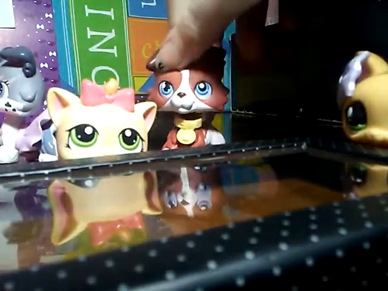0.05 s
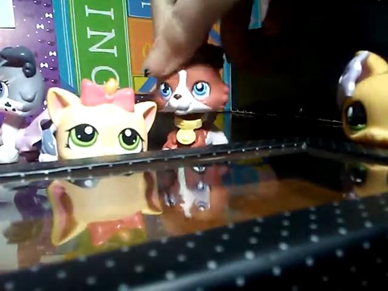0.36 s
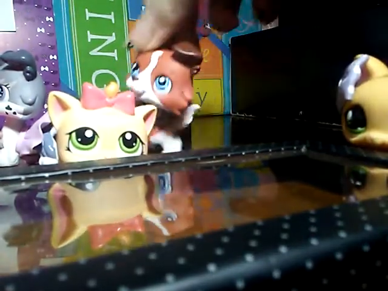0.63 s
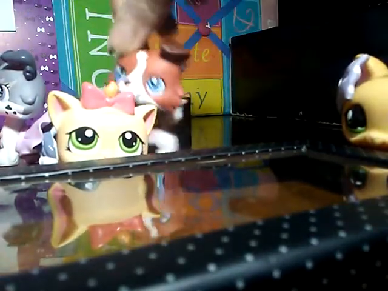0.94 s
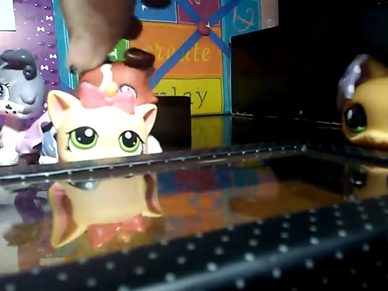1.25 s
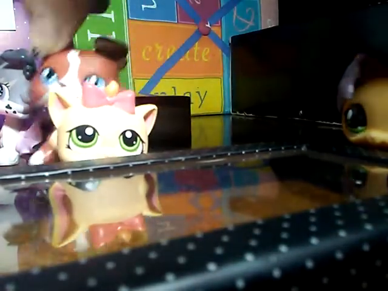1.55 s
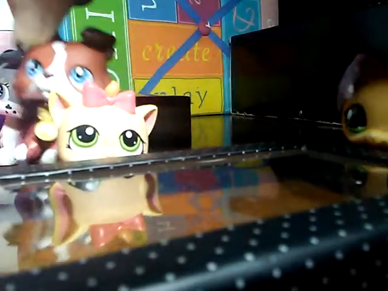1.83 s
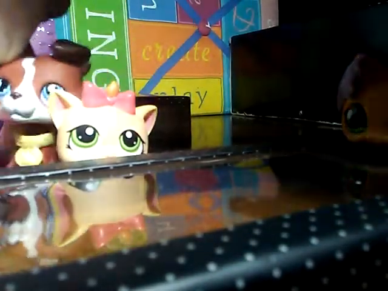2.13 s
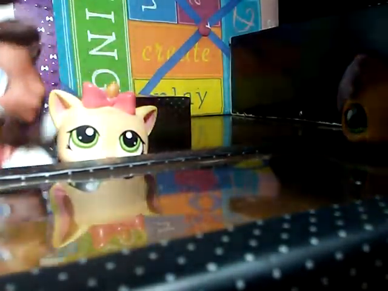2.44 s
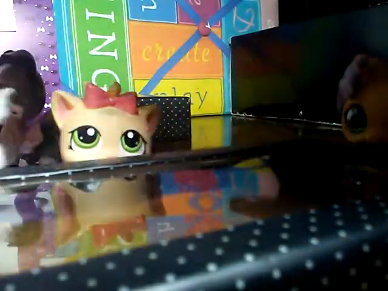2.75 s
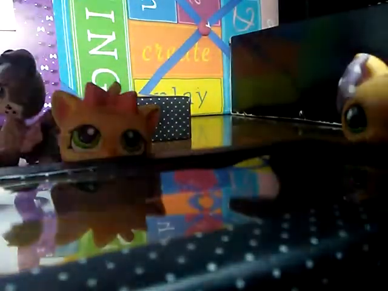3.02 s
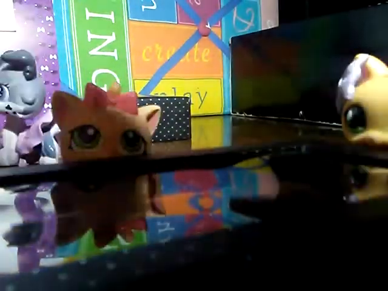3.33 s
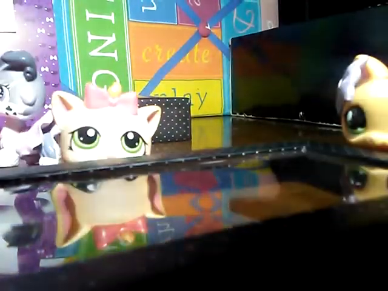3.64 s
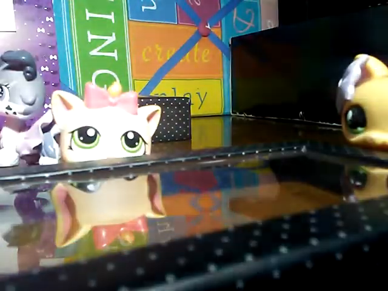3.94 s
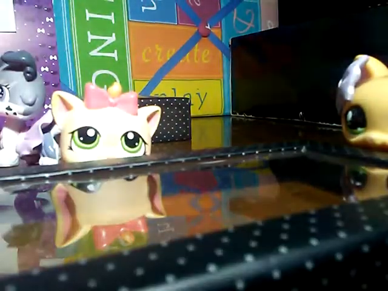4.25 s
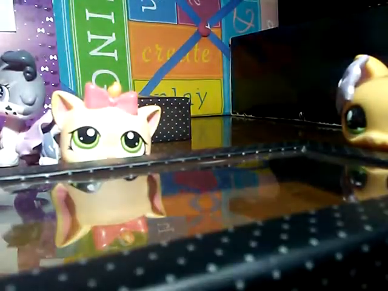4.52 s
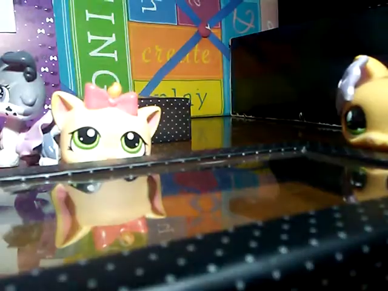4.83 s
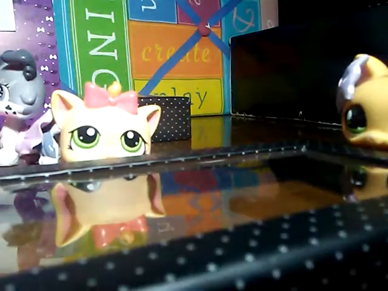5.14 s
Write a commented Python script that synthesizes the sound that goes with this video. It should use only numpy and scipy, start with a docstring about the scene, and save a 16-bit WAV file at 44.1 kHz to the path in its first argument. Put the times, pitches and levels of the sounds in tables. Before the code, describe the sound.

Faint room air, a low fan hum and a barely audible thin whine run throughout. Close to the microphone, a hollow plastic toy figure is walked by hand across a glossy tabletop. In the first second it gives a few light taps with faint bumps and scuffs. Firmer steps land at about 1.3, 1.7, 2.2 and 2.6 seconds, each a quick cluster of two to five contacts: a hollow knock, a crisp edge tick, a small thud and a brief ring from the table. Faint scuffs come around 1.8 and 2.1 seconds, and a light tap at 3. More firm steps follow at 3.3, 3.7, 4 and 4.3 seconds, the last two with soft, dull bumps as the toy is pressed down. Hiss swells briefly behind each sharp clack. A last faint bump comes near 4.7 seconds, leaving only the quiet room.

```python
"""Faint room air, a fan and a thin whine, then the close clacks of a hollow plastic toy figure walked by
hand across a glossy tabletop. Each step is a cluster of foot contacts: the shell knocks, its hard edge
ticks, the table thuds and rings, and nearby props throw the sound back. Now and then the hand presses
the toy down with a soft bump, or a foot scuffs along the gloss.
A noise suppressor opens on each sharp sound and lets the hiss swell briefly behind it."""
import sys
import numpy as np
from scipy import signal
from scipy.fft import irfft
from scipy.io import wavfile
from scipy.ndimage import uniform_filter1d

SR = 44100
rng = np.random.default_rng(int(sys.argv[2]) if len(sys.argv) > 2 else 0)


def generate_wav(signal):
    """Clip the signal to [-1, 1] and save it as 16-bit WAV at the path in sys.argv[1]."""
    frames = np.transpose(np.atleast_2d(signal))
    scaled = np.clip(frames, -1, 1) * 32767
    pcm = np.round(scaled).astype(np.int16)
    wavfile.write(sys.argv[1], SR, pcm)


N = 228482
TIME = np.arange(N) / SR
AGE = TIME[:SR // 2]  # seconds since a contact


def from_db(db):
    return 10 ** (np.asarray(db) / 20)


def rms_one(x):
    return x / np.sqrt(np.mean(x ** 2) + 1e-20)


def add(out, sound, start_s):
    """Mix a sound into the track."""
    start = max(round(start_s * SR), 0)
    out[start:start + len(sound)] += sound[:max(N - start, 0)]


def fade(t60_s):
    """Free decay after a contact."""
    return np.exp(-np.log(1000) * AGE / t60_s)


def swell(rise_s):
    """Soft attack: bending waves take a moment to fill a body."""
    return 1 - np.exp(-AGE / rise_s)


def low_cut(x, edge_hz):
    """A vibrating part hardly radiates below its lowest mode."""
    return signal.sosfilt(signal.butter(2, edge_hz, "high", fs=SR, output="sos"), x)


def band_pass(x, edges_hz, order=2):
    return signal.sosfilt(signal.butter(order, edges_hz, "band", fs=SR, output="sos"), x)


def coloured_noise(spectrum, size):
    """Noise shaped by an EQ curve, at rms 1."""
    hz, db = np.transpose(spectrum)
    bins_hz = np.maximum(np.fft.rfftfreq(size, 1 / SR), 1)
    gain = from_db(np.interp(np.log(bins_hz), np.log(hz), db))
    return rms_one(irfft(gain * np.exp(2j * np.pi * rng.random(len(bins_hz))), size))


def strike(modes, spread_db, detune):
    """Damped sines; strength and pitch shift with the contact point and the grip."""
    hz, db, t60_s = np.transpose(modes)[:, :, None]
    pitch_jitter, level_jitter = rng.standard_normal((2, len(modes), 1))
    phase = 2 * np.pi * hz * (1 + detune * pitch_jitter) * AGE
    return np.sum(from_db(db + spread_db * level_jitter) * fade(t60_s) * np.sin(phase), axis=0)


def favour(modes, pitch_hz, reach_octaves):
    """The place of contact favours the modes near one pitch."""
    return [(hz, db - min(6 * (np.log2(hz / pitch_hz) / reach_octaves) ** 2, 20), t60_s)
            for hz, db, t60_s in modes]


# EQ curve of the room tone: frequency_hz, gain_db
AIR_SPECTRUM = [(21, -49), (35, -3), (82, -4.5), (185, -1), (272, -7), (587, -6), (667, -13), (758, -4),
                (1300, -12.5), (2110, -21), (2460, -18), (2730, -23.5), (4680, -25), (14800, -29),
                (16000, -42)]
def room_air(level_db=-59.5):
    """A steady bed of room rumble and microphone hiss."""
    return from_db(level_db) * coloured_noise(AIR_SPECTRUM, N)


# The fan's tones, ahead of the trim: pitch_hz, level_db
FAN_TONES = [(91.5, -68), (172.3, -67), (608.3, -70.5), (753.7, -75)]
def fan(trim_db=-1, waver=1.2):
    """A faint fan hums in a few tones, each wavering on its own."""
    out = np.zeros(N)
    for pitch_hz, level_db in FAN_TONES:
        drift_cycles = waver * np.cumsum(rng.standard_normal(N)) / np.sqrt(SR)
        phase = 2 * np.pi * (pitch_hz * TIME + drift_cycles)
        out += from_db(level_db + trim_db) * np.sqrt(2) * np.sin(phase)
    return out


def whine(pitch_hz=4700, level_db=-85):
    """A very faint, diffuse whine: one narrow band of noise."""
    band = band_pass(rng.standard_normal(N), [pitch_hz - 100, pitch_hz + 100], order=1)
    return from_db(level_db) * rms_one(band)


# Main modes of the toy's shell: pitch_hz, gain_db, t60_s
SHELL_MODES = [(895, -2, 0.046), (1086, 1, 0.033), (1336, 5.5, 0.014), (1700, -15, 0.0034)]
def clack(pitch_hz):
    """The hollow knock of the shell, at peak 1; so small a body radiates little bass."""
    modes = favour(SHELL_MODES, pitch_hz, reach_octaves=.28)
    knock = band_pass(strike(modes, spread_db=1, detune=.015), edges_hz=[750, 2300])
    return knock / np.abs(knock).max()


# Upper modes of the shell: pitch_hz, gain_db, t60_s
SNAP_MODES = [(1950, -7, .016), (2170, 0, .02), (2430, -3, .028), (2760, -4, .022), (3420, -9, .024),
              (3680, -14, .018)]
def shell_snap():
    """The bright top of the clack: upper modes that harder contacts wake."""
    return low_cut(swell(.0009) * strike(SNAP_MODES, spread_db=2, detune=.025), edge_hz=1700)


# EQ curve of the tick: frequency_hz, gain_db
TICK_SPECTRUM = [(2500, -14), (4200, -3), (5200, -2), (6600, -1), (8200, 0), (10000, -9), (13000, -26),
                 (16000, -36)]
def edge_tick():
    """The foot's hard edge hits: a crisp burst of noise with a faint tail."""
    envelope = swell(.0007) * fade(.015) + from_db(-26) * fade(.09)
    return coloured_noise(TICK_SPECTRUM, len(AGE)) * envelope


# Modes of the tabletop: pitch_hz, gain_db, t60_s
TABLE_MODES = [(105.8, -12, 0.41), (137.4, -8, 0.26), (167.6, -3.5, 0.18), (182.4, -9.5, 0.24),
               (233.6, -0.5, 0.064), (293, -4, 0.17), (358.4, -14.5, 0.14), (406.7, -0.5, 0.096),
               (480, 2.5, 0.053), (559, -15, 0.31), (674, -7.5, 0.21)]
def table_thud(pitch_hz):
    """The tabletop's low modes give a contact its weight."""
    modes = favour(TABLE_MODES, pitch_hz, reach_octaves=1.52)
    return low_cut(strike(modes, spread_db=5, detune=.0069), edge_hz=65)


# Joint modes of toy and table: pitch_hz, gain_db, t60_s
RING_MODES = [(903, -21.5, 0.14), (1053, -32, 0.37), (1220, -29.5, 0.31), (1245, -29.5, 0.17),
              (1498, -28, 0.18), (1540, -51, .1), (1690, -42, 0.17), (1888, -17, 0.022)]
def ring(gain_db=-2):
    """Toy and table ring on together after the clack."""
    return from_db(gain_db) * strike(RING_MODES, spread_db=5, detune=.0047)


# EQ curve of the reverb: frequency_hz, gain_db
SCATTER_SPECTRUM = [(100, -16), (200, -7), (450, -6), (720, -11), (950, -1), (1450, 0), (1800, -12),
                    (2300, -8), (3400, -15), (4300, -27), (8000, -33), (16000, -50)]
def scatter(near_db=-15, far_db=-24, room_db=-41):
    """A diffuse tail: sound scatters among near and far props, then dies away in the room."""
    envelope = from_db(near_db) * fade(.035) + from_db(far_db) * fade(.12) + from_db(room_db) * fade(.72)
    return coloured_noise(SCATTER_SPECTRUM, len(AGE)) * envelope


# Early reflections off the backdrop and props: delay_s, gain_db
REFLECTIONS = [(.0030, -13.5), (.0043, -12.5)]
def add_echoes(out, direct, start_s):
    """Close surfaces throw a contact back; the paths change as the toy moves."""
    for delay_s, gain_db in REFLECTIONS:
        add(out, from_db(gain_db) * direct, start_s + delay_s * rng.uniform(.92, 1.08))


# Foot contacts, each with its clack's peak and favoured pitch: start_s, level_db, pitch_hz
FOOT_CONTACTS = [(.186, -24.5, 1280), (.39, -38, 1010), (0.597, -30.5, 1310), (.75, -30.5, 1070),
                 (.792, -40.5, 1030), (0.905, -41.5, 880), (1.246, -14.5, 1050), (1.251, -17, 1150),
                 (1.286, -14, 1450), (1.304, -16.5, 1130), (1.374, -27, 1410), (1.386, -29, 880),
                 (1.618, -37, 1060), (1.671, -18, 1076), (1.713, -17.5, 1280), (1.717, -18, 970),
                 (1.725, -21.5, 1290), (1.803, -28, 1035), (2.179, -19.5, 1060), (2.225, -31.5, 1000),
                 (2.254, -27, 1030), (2.296, -33, 1080), (2.581, -18.5, 1150), (2.602, -28.5, 1090),
                 (2.626, -30.5, 1220), (2.633, -32.5, 1040), (2.665, -45, 1490), (2.981, -33.5, 1350),
                 (3.288, -20, 1520), (3.306, -18.5, 1360), (3.321, -28, 1180), (3.347, -28.5, 1280),
                 (3.651, -17, 1210), (3.673, -16, 1160), (3.677, -25.5, 1040), (3.732, -29.5, 1190),
                 (3.966, -16.5, 1050), (3.986, -14.5, 1290), (3.989, -21.5, 1020), (4.008, -21.5, 1090),
                 (4.259, -20, 1310), (4.279, -17.5, 845), (4.284, -20, 820), (4.307, -26, 824),
                 (4.426, -41, 885)]
# How each step lands, shared by the contacts nearest to it:
# time_s, thud_pitch_hz, extra_thud_db, extra_snap_db, extra_tick_db
LANDINGS = [(.2, 425, -5, 3, -28), (.7, 178, 1.5, -9, -9), (1.3, 187, 2, 4.5, 6.5), (1.7, 168, 1, 5.5, 1.5),
            (2.2, 334, -3, 6, -5), (2.6, 174, 4.5, 1.5, -1), (3.3, 160, 4, 2.5, 3.5),
            (3.7, 283, 3, -1.5, 1.5), (4.0, 276, 3, -2.5, 6.5), (4.3, 487, 4.5, 5.5, 3.5)]
def footsteps(firm_db=-16.5, rebound_within_s=.1):
    """The toy walks: hard contacts are bright, soft ones mostly thud, and rebounds carry less weight."""
    out = np.zeros(N)
    previous_s = -np.inf
    for start_s, level_db, pitch_hz in FOOT_CONTACTS:
        landing = min(LANDINGS, key=lambda row: abs(row[0] - start_s))
        _, thud_pitch_hz, extra_thud_db, extra_snap_db, extra_tick_db = landing
        force_db = level_db - firm_db
        rebound = start_s - previous_s < rebound_within_s
        previous_s = start_s

        # each layer: gain on a firm contact, growth with force, this landing's colour, rebound dip
        thud_db = -33.5 + .56 * force_db + extra_thud_db - 3.5 * rebound
        snap_db = -29.5 + 1.8 * force_db + extra_snap_db - 2.5 * rebound
        tick_db = -42 + 1.08 * force_db + extra_tick_db - 3.5 * rebound

        shell = from_db(snap_db) * shell_snap() + from_db(level_db) * clack(pitch_hz)
        direct = shell + from_db(tick_db) * edge_tick()
        add(out, direct, start_s)
        add_echoes(out, direct, start_s)

        thud = from_db(thud_db) * table_thud(thud_pitch_hz)
        tail = from_db(level_db) * (ring() + scatter())
        add(out, low_cut(swell(.0036) * (thud + tail), edge_hz=107), start_s)
    return out


# The hand shifts the toy or presses it down: start_s, pitch_hz, gain_db
HAND_PUSHES = [(.392, 415, -43), (.431, 420, -40), (.557, 444, -41), (.907, 481, -36), (3.996, 393, -23.5),
               (4.059, 407, -31.5), (4.285, 421, -21), (4.357, 287, -30.5), (4.451, 403, -38.5),
               (4.723, 404, -41.5)]
def bumps(rise_s=.0037, t60_s=.056):
    """A soft push wakes only one low, well damped mode."""
    out = np.zeros(N)
    envelope = swell(rise_s) * fade(t60_s)
    for start_s, pitch_hz, gain_db in HAND_PUSHES:
        add(out, from_db(gain_db) * envelope * np.sin(2 * np.pi * pitch_hz * AGE), start_s)
    return out


# Short slides of the toy: middle_s, core_length_s, centre_hz, gain_db
SLIDES = [(0.492, .013, 7640, -57), (0.672, .092, 1190, -55), (.694, 0.057, 2860, -56),
          (0.74, 0.021, 10900, -60.5), (1.801, .11, 7700, -53), (2.091, 0.048, 2540, -58),
          (2.116, 0.068, 1010, -55), (2.9, 0.04, 8050, -65.5), (4.246, 0.029, 3930, -52)]
def scuffs(grain_db=4.5, octaves_at_1khz=.41, widening=.18):
    """Plastic slides on the gloss: a short swell of fine, grainy friction."""
    out = np.zeros(N)
    for middle_s, core_length_s, centre_hz, gain_db in SLIDES:
        size = int(core_length_s * SR * 3 / 2)  # room for the fades
        width_octaves = octaves_at_1khz + widening * np.log2(centre_hz / 1000)
        edges_hz = np.minimum(centre_hz * 2 ** (np.array([-.5, .5]) * width_octaves), SR / 2 - 1000)
        friction = rng.standard_normal(size)
        roughness = rms_one(uniform_filter1d(rng.standard_normal(size), size=40))
        rub = rms_one(band_pass(friction * from_db(grain_db * roughness), edges_hz))
        add(out, from_db(gain_db) * rub * np.hanning(size), middle_s - size / SR / 2)
    return out


def scene():
    """The walking toy over the room's quiet bed, in mono."""
    return (footsteps() + bumps() + scuffs() + room_air() + fan() + whine())[None]


def suppressor(x, split_hz=3500, threshold_db=-66, knee_db=12, lift_db=7, release_s=.22):
    """The treble opens up when it rises over a threshold, then sinks back slowly."""
    treble = signal.sosfiltfilt(signal.butter(1, split_hz, "high", fs=SR, output="sos"), x)
    treble_db = 10 * np.log10(np.maximum(uniform_filter1d(treble ** 2, size=200), 1e-14))
    opening = np.clip((treble_db - threshold_db) / knee_db, 0, 1)
    held = np.maximum.accumulate(opening + TIME / release_s, axis=-1) - TIME / release_s
    return x + treble * (from_db(lift_db * held) - 1)


def record(dry, cutoff_hz=16100):
    """Noise suppression, then a steep high cut."""
    high_cut = signal.ellip(10, .1, 80, cutoff_hz, fs=SR, output="sos")
    return signal.sosfilt(high_cut, suppressor(dry))


dry = scene()
out = record(dry)
generate_wav(out)
```